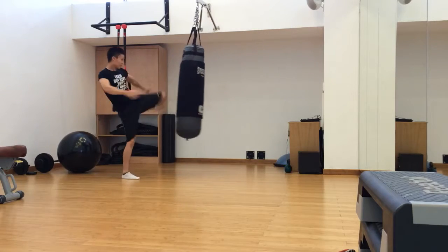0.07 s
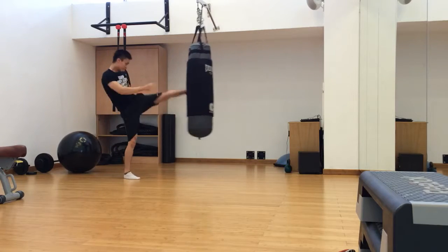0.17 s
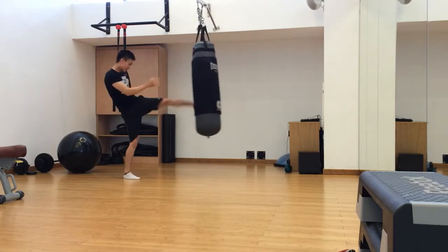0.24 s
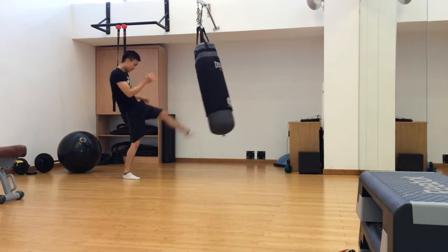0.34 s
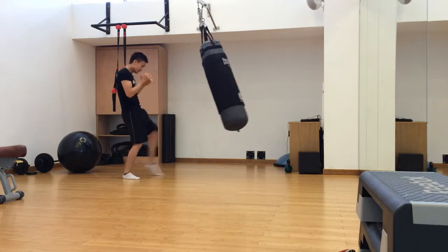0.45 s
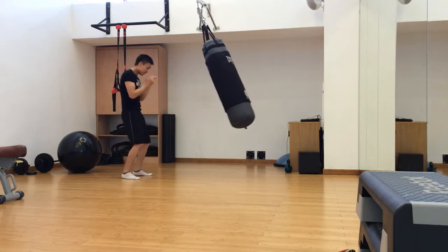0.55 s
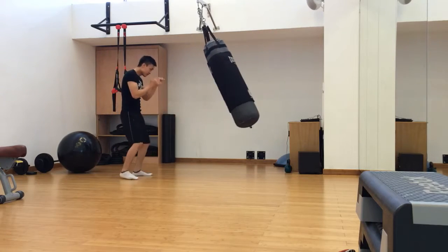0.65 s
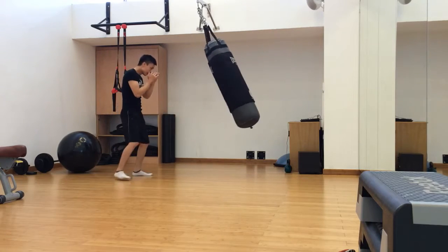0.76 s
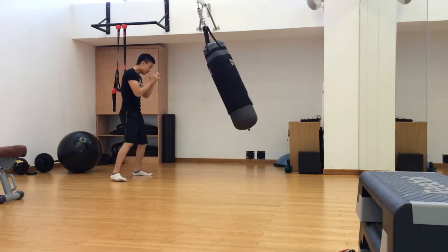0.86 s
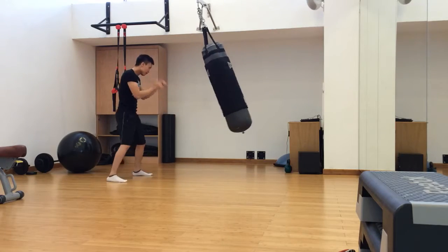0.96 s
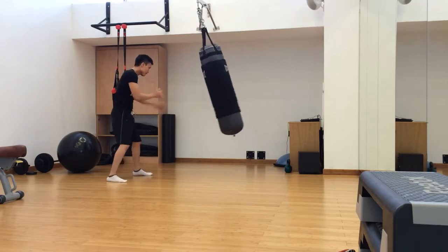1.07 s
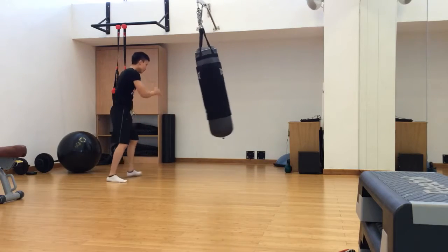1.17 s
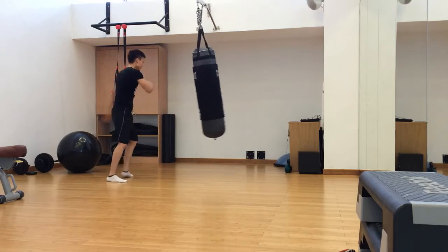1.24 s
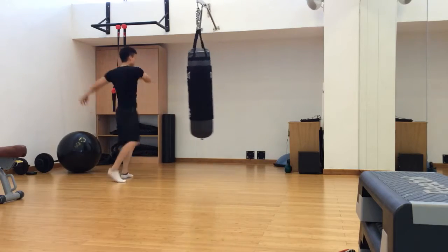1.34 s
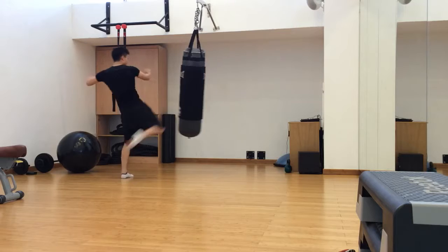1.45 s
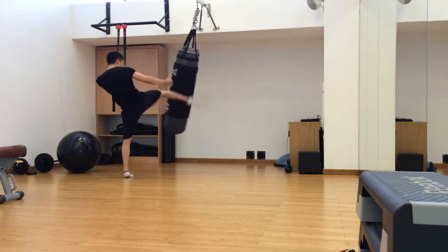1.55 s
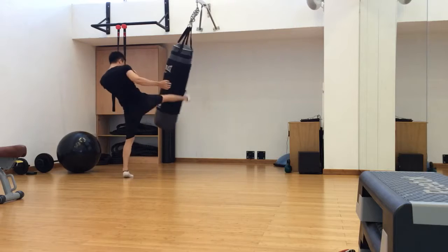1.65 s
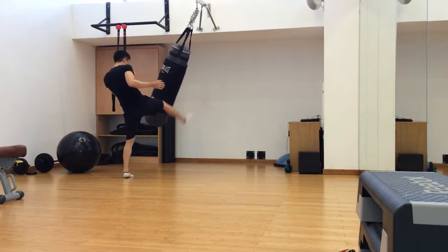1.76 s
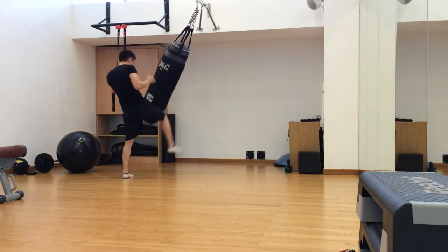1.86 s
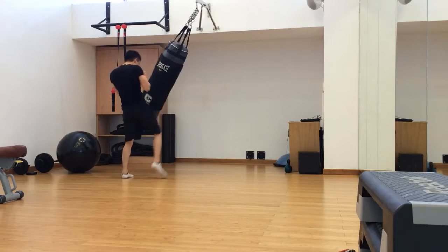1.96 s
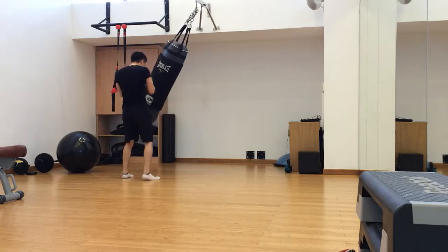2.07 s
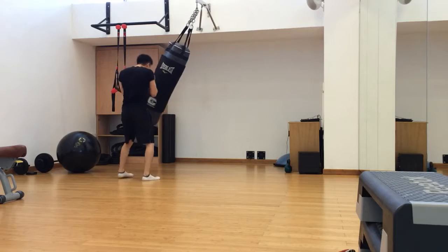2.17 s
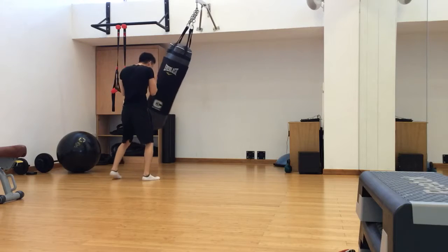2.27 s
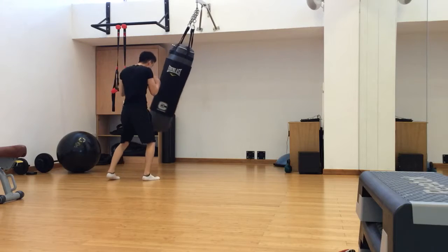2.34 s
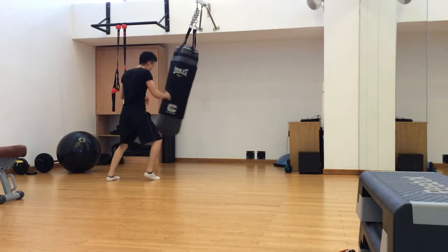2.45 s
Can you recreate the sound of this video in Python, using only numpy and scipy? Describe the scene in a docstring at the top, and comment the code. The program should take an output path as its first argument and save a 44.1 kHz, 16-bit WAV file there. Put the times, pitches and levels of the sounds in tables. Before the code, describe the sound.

Heavy bag kicked twice, sharp slap with deep thump, ringing room echo and faint chain jingle.

```python
"""Two hard kicks land on a heavy hanging bag in a bare, echoing gym.
Each is a smack (sharp pulses, hiss) and a thud (one pressure pulse), with wall echoes, room modes and hall noise.
Straps snap (noise burst) and the steel chain jingles and squeaks (resonated touches and noise).
Footfalls boom (short sines); clothes and soles swish over a low room rumble (third-octave noise)."""
import sys
import numpy as np
from scipy import signal
from scipy.io import wavfile

SR = 44100
rng = np.random.default_rng(int(sys.argv[2]) if len(sys.argv) > 2 else 0)


def int16_out(signal):
    """Quantize to a 16-bit WAV file."""
    q = np.round(np.clip(np.atleast_2d(signal).T, -1, 1) * 32767)
    wavfile.write(sys.argv[1], SR, q.astype(np.int16))


N = 110250
T = np.arange(N) / SR
BAND_EDGES_HZ = 22 * 2 ** (np.arange(30.) / 3)
BAND_CENTRES_HZ = np.sqrt(BAND_EDGES_HZ[1:] * BAND_EDGES_HZ[:-1])

# Kicks: (time [s], thud level [dB], thud pitch [Hz], flutter level [dB], hiss level [dB],
# hiss length [s], hall level [dB], hall tilt above the smack pitch [dB/octave])
KICKS = [(0.2147, -2, 125, -8, -24.5, 0.0056, 1.5, 0.2), (1.6693, -7.5, 114.9, 3, -27, .0022, 2.84, -1.12)]
THUD_LAG_S = 0.00395  # the filling gives way just after the cover is hit
# Air drawn along by the leg just before contact; level relative to the thud
SUCTION_DB, SUCTION_LEAD_S, SUCTION_WIDTH_S = -16, 0.0016, 0.003
SMACK_HZ, SMACK_FADE_S, SMACK_PULSE_SHARPNESS, SMACK_TOP_HZ = 1636, 0.0016, 2.6, 4900
# Wall echoes: (delay [s], relative level [dB], low-pass cutoff [Hz])
ECHOES = [(.0102, -3, 900), (.0213, 1, 3500), (.0283, -20, 3500), (.0502, -9.5, 600), (.061, -7, 169),
          (.074, -17, 153), (.0885, -5, 170), (.101, -5.5, 128), (.1116, -6, 220), (.152, -9.5, 127)]
ECHO_SMACK_DB = -13  # the smack comes back weaker than the thud
# Low room modes: (frequency [Hz], level relative to the thud [dB], t60 [s])
ROOM_MODES = [(62, -25, .65), (76, -24.5, 1.1), (98, -23, .55), (132, -29, .5), (178, -17.5, .55),
              (190, -23, .55), (227, -28, .85), (312, -32, 1.1), (373, -28, 1.1), (437, -29.5, 1.2),
              (535, -37, 1.4), (703, -41, 1.7), (940, -40, 1.9), (1178, -43, 1.9), (1612, -41, 1.9)]
# Diffuse hall: (frequency [Hz], early relative level [dB], late relative level [dB], late t60 [s])
HALL = [(30, -66, -76, 1), (49.3, -35, -38, 1.7), (78, -31, -34, 2.8), (124, -19, -46, 3.2),
        (190, -17.5, -34.5, 1.4), (250, -30, -34.5, 1.53), (393, -21.5, -29.5, 1.31),
        (640, -33.5, -34, 2.12), (1050, -27.5, -33.5, 2.64), (1355, -30, -33, 2.75),
        (1580, -31, -30.5, 2.77), (1980, -25, -32, 2.5), (2500, -24.5, -32.5, 2.45),
        (3170, -29.5, -33, 2.34), (5250, -35, -39, 2.32), (9600, -42.5, -39, 1.51), (14000, -76, -37, 1.4)]
EARLY_T60_S, HALL_BUILD_S = 0.31, 0.011

SNAP_AT_S, SNAP_LENGTH_S, SNAP_DB = 1.6866, 0.0015, -27
# Strap snap spectrum: (frequency [Hz], relative level per third octave [dB])
SNAP = [(300, -31), (2000, -19), (5000, 7), (8000, -16), (12000, -3), (15000, -5)]

# Chain jerks: (time [s], relative level [dB], swell [s], fade [s], tilt away from chain centre [dB/kHz])
JERKS = [(.243, -19.5, 0.058, 0.033, -2), (.375, -27, 0.022, 0.041, -2), (.605, -33.5, 0.011, 0.12, 0),
         (.74, -39.5, 0.016, 0.071, 0), (.93, -32.5, 0.027, 0.019, -18.5), (1.113, -39, 0.016, 0.029, -8),
         (1.678, -34.5, 0.016, 0.045, 4), (1.721, -28.5, 0.025, 0.046, 3), (1.82, -29, 0.017, .035, 3),
         (1.95, -42, 0.022, 0.062, -7)]
# Link resonances: (frequency [Hz], width [Hz], relative level [dB], t60 in the hall [s])
LINKS = [(12000, 140, -7.5, 0.71), (12780, 90, -3.5, .9), (12630, 36, -1.5, 0.86), (13200, 27, 2, 0.93),
         (13797, 14, -5, .75), (14060, 275, -2, 0.18), (14280, 210, -13.5, 0.44), (15220, 200, -9, 0.59),
         (15930, 200, -21, .55)]
TOUCHES_PER_LINK_PER_S, CHAIN_CENTRE_HZ = 180, 13180
CHAIN_WET_DB, CHAIN_DRY_DB = -2, -1.5
SQUEAK_AT_S, SQUEAK_LENGTH_S, SQUEAK_HZ, SQUEAK_WIDTH_HZ, SQUEAK_DB = 0.876, 0.017, 13060, 18, -30

# Footfalls on the wooden floor: (time [s], level [dB])
STEPS = [(0.475, -19.5), (0.715, -28.5), (1.928, -25.5), (2.275, -42)]
STEP_HZ, STEP_SWELL_S, STEP_FADE_S = 76.5, 0.013, 0.025
# Swishes of clothes and shoes: (time [s], relative level [dB], swell [s], fade [s])
SWISHES = [(-.03, -58, 0.014, 0.095), (.6, -39.5, 0.035, 0.053), (0.719, -43, 0.022, 0.14),
           (1.597, -55.5, 0.033, 0.34), (2.2, -54, 0.034, 0.058)]
# Swish spectrum: (frequency [Hz], relative level per third octave [dB])
SWISH = [(300, -9.5), (700, -7.5), (1400, 0), (2200, -4), (4000, -4), (6500, -7.5), (8000, -4.5),
         (11000, -7.5), (15000, -25)]
# Room rumble and hiss: (frequency [Hz], level per third octave [dB])
FLOOR = [(25, -87), (38, -63), (52, -53), (85, -57.5), (125, -58.5), (175, -59), (260, -61.5), (700, -63),
         (1400, -66.5), (2000, -69.5), (2700, -69), (5400, -68), (9500, -73), (15000, -82)]
RUMBLE_CUT_HZ, CEILING, CUTOFF_HZ = 7.3, 0.7, 15300


def from_db(db):
    """Decibels to amplitude."""
    return 10 ** (np.asarray(db) / 20)


def rms_one(x):
    """Scale to rms 1."""
    return x / np.sqrt(np.mean(x ** 2) + 1e-20)


def at_hz(rows, hz):
    """Every column of a table at one frequency, interpolated over log frequency."""
    freqs_hz, *columns = np.transpose(rows)
    return [np.interp(np.log(hz), np.log(freqs_hz), column) for column in columns]


def dying(t, t60_s):
    """Silent before t = 0, then 60 dB down every t60."""
    return (t >= 0) * np.exp(-np.log(1000) * np.maximum(t, 0) / t60_s)


def gesture(start_s, swell_s, fade_s):
    """A straight rise, then an exponential fall with time constant fade_s."""
    rise = np.clip((T - start_s) / swell_s, 0, 1)
    return rise * np.exp(-np.maximum(T - start_s - swell_s, 0) / fade_s)


def bump(t, width_s):
    """A Gaussian envelope around t = 0."""
    return np.exp(-(t / width_s) ** 2)


def low_pass(x, hz):
    """Second-order low-pass."""
    sos = signal.butter(2, min(hz, SR / 2 - 1), fs=SR, output="sos")
    return signal.sosfilt(sos, x + 1e-18)


def resonate(x, hz, width_hz):
    """One two-pole resonance with gain about 1 at its peak."""
    r = np.exp(-np.pi * width_hz / SR)
    zeros = np.array([1, 0, -1]) * (1 - r * r) / 2
    poles = [1, -2 * r * np.cos(2 * np.pi * hz / SR), r * r]
    return signal.lfilter(zeros, poles, x + 1e-18)


def noise_bands():
    """Third-octave bands of noise, each with rms 1: (centre [Hz], band)."""
    white = rng.standard_normal((2, N + SR))  # neighbouring bands use different noise
    bands = []
    for k, hz in enumerate(BAND_CENTRES_HZ):
        sos = signal.butter(3, BAND_EDGES_HZ[k:k + 2], "band", fs=SR, output="sos")
        settled = signal.sosfilt(sos, white[k % 2])[SR:]
        bands.append((hz, rms_one(settled)))
    return bands


def coloured(spectrum):
    """Steady noise with the given third-octave levels."""
    return sum(from_db(at_hz(spectrum, hz)[0]) * band for hz, band in noise_bands())


def thud(t, hz):
    """The bag is dented and springs back: suction, one push of air, suction."""
    u = (np.pi * hz * (t - THUD_LAG_S)) ** 2
    push = (1 - 2 * u) * np.exp(-u)
    return push - from_db(SUCTION_DB) * bump(t + SUCTION_LEAD_S, SUCTION_WIDTH_S)


def smack(t, flutter_db, hiss_db, hiss_length_s):
    """The cover flutters against the shin in a few sharp pulses while trapped air hisses out."""
    pulses = np.exp(-SMACK_PULSE_SHARPNESS * (1 + np.cos(2 * np.pi * SMACK_HZ * t)))
    flutter = pulses * bump(t, SMACK_FADE_S)
    hiss = rms_one(low_pass(rng.standard_normal(N), SMACK_TOP_HZ)) * bump(t, hiss_length_s)
    return (t >= 0) * (from_db(hiss_db) * hiss - from_db(flutter_db) * flutter)


def wall_echoes(sent):
    """Delayed, low-passed copies of a kick return from the walls."""
    return sum(from_db(db) * low_pass(np.interp(T - delay_s, T, sent), top_hz)
               for delay_s, db, top_hz in ECHOES)


def room_modes(t):
    """Low standing waves start with the kick and die away as sines."""
    return sum(from_db(db) * np.sin(2 * np.pi * hz * t) * dying(t, t60_s)
               for hz, db, t60_s in ROOM_MODES)


def hall(bands, tilt_db_per_octave):
    """Diffuse sound builds up quickly, drops at first, then dies slowly in each band."""
    out = 0
    for hz, band in bands:
        early_db, late_db, late_t60_s = at_hz(HALL, hz)
        early = from_db(early_db) * dying(T, EARLY_T60_S)
        late = from_db(late_db) * dying(T, late_t60_s)
        tilt_db = tilt_db_per_octave * max(np.log2(hz / SMACK_HZ), 0)
        out = out + band * np.hypot(early, late) * from_db(tilt_db)
    return out * (1 - np.exp(-T / HALL_BUILD_S))


def kicks():
    """Each kick sends smack and thud to the walls, modes and hall; both share the hall noise."""
    out, bands = 0, noise_bands()
    for at_s, thud_db, thud_hz, flutter_db, hiss_db, hiss_s, hall_db, tilt_db in KICKS:
        t = T - at_s
        low = from_db(thud_db) * thud(t, thud_hz)
        crack = smack(t, flutter_db, hiss_db, hiss_s)
        echoes = wall_echoes(low + from_db(ECHO_SMACK_DB) * crack)
        boom = from_db(thud_db) * room_modes(t)
        tail = np.pad(hall(bands, tilt_db), (int(at_s * SR), 0))[:N]
        out = out + low + crack + echoes + boom + from_db(hall_db) * tail
    return out


def snap():
    """The hanging straps snap taut just after the second kick: a short coloured noise burst."""
    return from_db(SNAP_DB) * coloured(SNAP) * bump(T - SNAP_AT_S, SNAP_LENGTH_S)


def chain():
    """Each jerk sets off a shower of link touches that ring very high and linger in the hall."""
    out = 0
    for hz, width_hz, link_db, t60_s in LINKS:
        struck = rng.random(N) < TOUCHES_PER_LINK_PER_S / SR
        touches = struck * rng.uniform(-0.74, 1, N)
        off_khz = abs(hz - CHAIN_CENTRE_HZ) / 1000
        power = sum((from_db(db + tilt * off_khz) * gesture(at_s, swell_s, fade_s)) ** 2
                    for at_s, db, swell_s, fade_s, tilt in JERKS)
        ringing = rms_one(resonate(touches, hz, width_hz))
        dry = from_db(link_db) * np.sqrt(power) * ringing / 2
        response = rng.standard_normal(N) * dying(T, t60_s)
        wet = np.std(dry) * rms_one(signal.fftconvolve(dry, response)[:N])
        out = out + from_db(CHAIN_DRY_DB) * dry + from_db(CHAIN_WET_DB) * wet
    return out


def squeak():
    """A link slips on the hook with one thin squeak as the bag swings back."""
    narrow = resonate(rng.standard_normal(N), SQUEAK_HZ, SQUEAK_WIDTH_HZ)
    tone = np.cos(np.angle(signal.hilbert(narrow)))  # keeps the wandering phase, evens the level
    return from_db(SQUEAK_DB) * rms_one(tone) * bump(T - SQUEAK_AT_S, SQUEAK_LENGTH_S)


def steps():
    """Soft landings make the floor boom briefly at one pitch."""
    return sum(from_db(db) * gesture(at_s, STEP_SWELL_S, STEP_FADE_S)
               * np.sin(2 * np.pi * STEP_HZ * (T - at_s)) for at_s, db in STEPS)


def swishes():
    """Soft rubbing of clothes and soles as the legs move: coloured noise in swells."""
    motion = sum(from_db(db) * gesture(at_s, swell_s, fade_s) for at_s, db, swell_s, fade_s in SWISHES)
    return coloured(SWISH) * motion


def room_floor():
    """Steady room rumble and hiss."""
    return coloured(FLOOR)


def scene():
    """Everything reaches one microphone, alike in both channels."""
    mono = kicks() + snap() + chain() + squeak() + steps() + swishes() + room_floor()
    return np.array([mono, mono])


def record(dry):
    """The lowest rumble is reduced, the highest peaks are clipped and the top is cut."""
    high_pass = signal.butter(1, RUMBLE_CUT_HZ, "high", fs=SR, output="sos")
    clipped = np.clip(signal.sosfilt(high_pass, dry), -CEILING, CEILING)
    top_cut = signal.ellip(10, 0.1, 70, CUTOFF_HZ, fs=SR, output="sos")  # order, ripple dB, stop dB
    return signal.sosfilt(top_cut, clipped)


dry = scene()
out = record(dry)
int16_out(out)
```